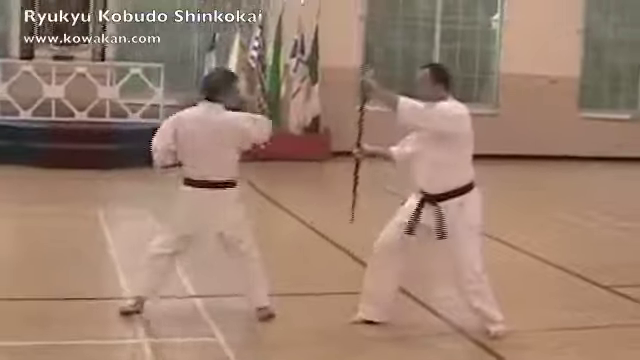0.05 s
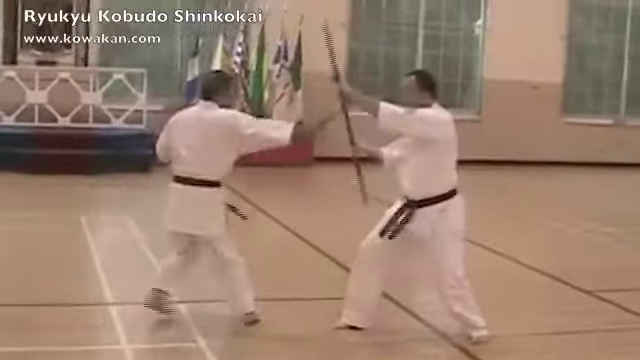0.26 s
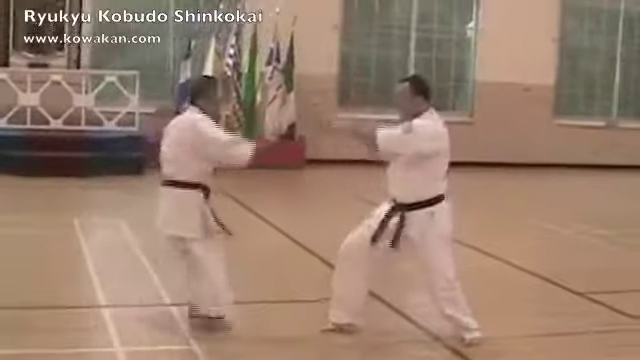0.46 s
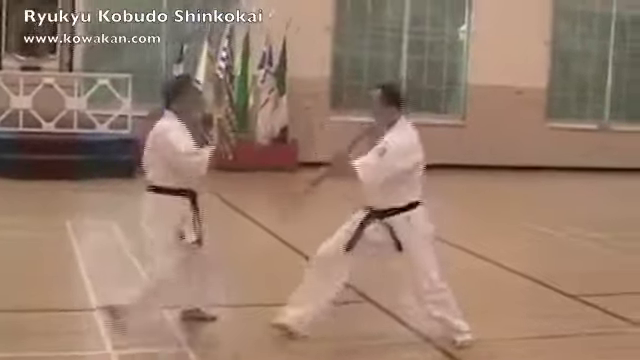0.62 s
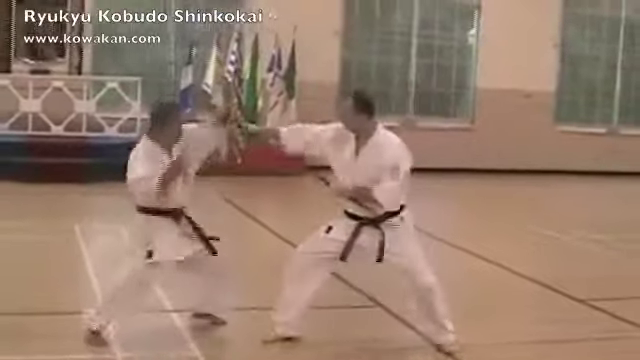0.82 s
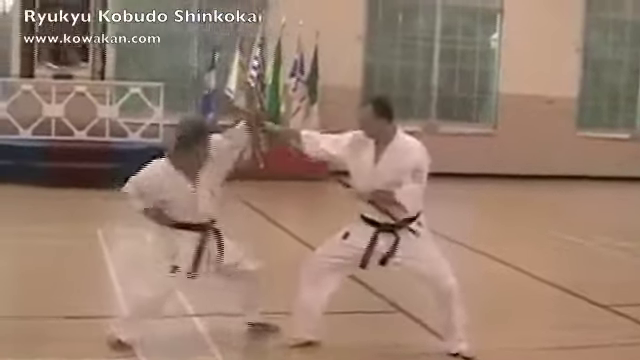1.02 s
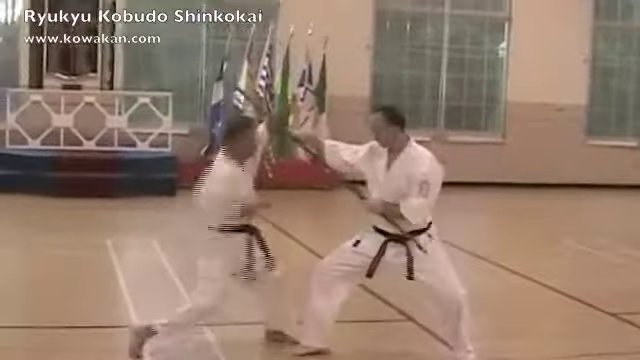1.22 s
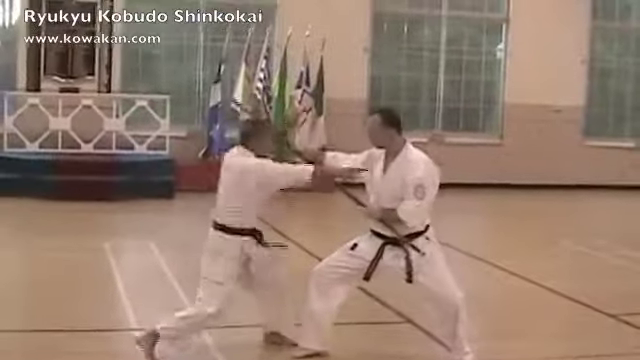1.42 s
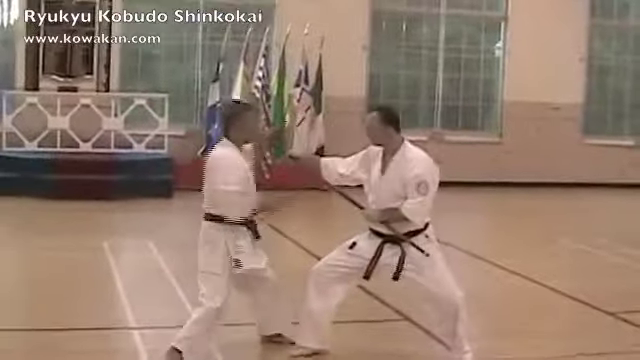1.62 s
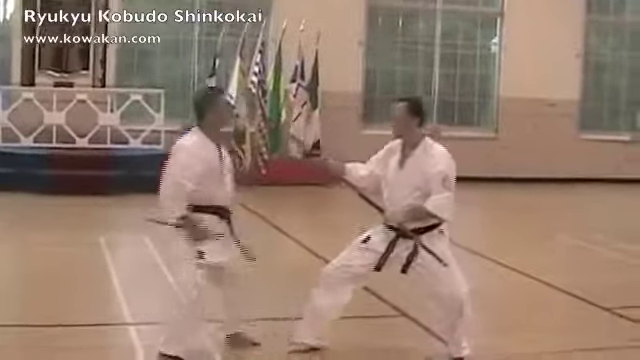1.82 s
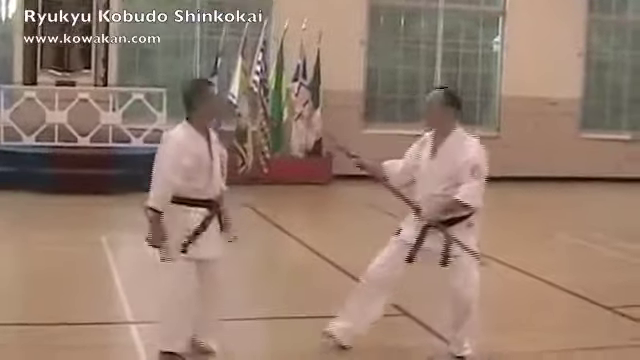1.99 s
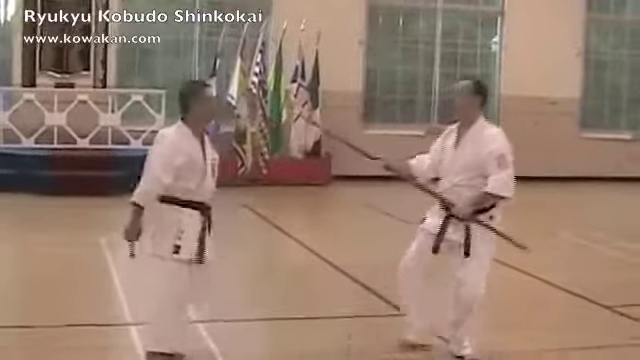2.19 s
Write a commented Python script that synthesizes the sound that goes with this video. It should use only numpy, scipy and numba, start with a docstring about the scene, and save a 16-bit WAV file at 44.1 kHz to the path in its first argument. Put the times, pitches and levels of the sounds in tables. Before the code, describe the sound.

A wooden staff cracks twice against a steel weapon, echoing through a large gymnasium.

```python
"""Staff against sai in an empty gymnasium

A wooden staff cracks twice on a steel sai while an earlier blow still dies away in the large hall.
Each crack overloads the camera microphone, whose limiter ducks and recovers, holding the hall's
long ring level before it fades. The ventilation hums, bare feet thud and slide on the wooden
floor, and cotton uniforms swish."""
import sys
import numpy as np
from scipy import signal
from scipy.fft import rfft, irfft, next_fast_len
from scipy.io import wavfile
from scipy.ndimage import uniform_filter1d
from numba import njit

SR = 44100
rng = np.random.default_rng(int(sys.argv[2]) if len(sys.argv) > 2 else 0)


def transcribe(signal):
    """Save signal, clipped to [-1, 1], as a 16-bit WAV file at the path in sys.argv[1]."""
    frames = np.atleast_2d(signal).T
    limited = np.clip(frames, -1, 1)
    pcm = np.round(limited * 32767).astype(np.int16)
    wavfile.write(sys.argv[1], SR, pcm)


N = 103635


def amp(db):
    return 10 ** (np.asarray(db) / 20)


def unit_rms(x):
    return x / np.sqrt(np.mean(x ** 2) + 1e-20)


def bump(x, centre, width):
    return np.exp(-((x - centre) / width) ** 2 / 2)


def curve_at(points, hz):
    point_hz, values = np.transpose(points)
    return np.interp(np.log(hz + 1), np.log(point_hz + 1), values)


def add(mix, start_s, sound):
    """Mixes in a sound that may have begun before time zero."""
    at = round(start_s * SR)
    sound = sound[:, max(-at, 0):]
    part = mix[:, max(at, 0):][:, :sound.shape[1]]
    part += sound[:, :part.shape[1]]


# Stereo width at the microphone. Each row: frequency in Hz, side minus mid in dB.
STEREO_WIDTH = [(50, -11), (140, -21), (300, -15.5), (700, -9), (2000, -8), (6000, -8), (14000, 7.5)]

def spread(pair):
    """Turns two unrelated signals into left and right, nearly mono in the bass."""
    mid, side = pair
    size = next_fast_len(len(mid))
    width = amp(curve_at(STEREO_WIDTH, np.fft.rfftfreq(size, 1 / SR)))
    side = irfft(rfft(side, size) * width, size)[:len(mid)]
    return np.array([mid + side, mid - side])


def noise(spectrum):
    """Stereo noise of a given colour, at unit level."""
    size = next_fast_len(N)
    white = rfft(rng.standard_normal((2, size)))
    colour = amp(curve_at(spectrum, np.fft.rfftfreq(size, 1 / SR)))
    return unit_rms(spread(irfft(white * colour, size)[:, :N]))


# The broad crack of wood on steel. Each row: frequency in Hz, relative level in dB.
CRACK_SPECTRUM = [(50, -29), (170, -25.5), (350, -17), (560, -20), (950, -13), (1400, -16.5), (2200, -9.5),
                  (2900, -17), (3900, -19), (4900, -22), (7500, -33.5), (11500, -40), (16000, -26)]
# The crack's beam. Each row: frequency in Hz, gain toward the microphone over the hall in dB.
CRACK_BEAM = [(100, -8), (500, 2.5), (900, 10.5), (1300, 12), (2000, 7.5), (3400, -0.5), (4400, 10),
              (7000, 2), (14000, -3)]
# Staff and sai ringing together. Each row: frequency in Hz, time to fall 60 dB in seconds,
# then relative level in dB for contact points 0, 1 and 2.
WEAPON_MODES = [(560, 0.027, -26, -15, -27), (815, 0.017, -38, -9, -4), (1091, 0.021, -8, -6.5, -8),
                (1250, 0.035, 0.5, -31, 3.5), (1578, 0.012, -9, -7, -0.5), (1688, 0.026, 5.5, -7.5, -20),
                (1839, 0.012, 1.5, -3.5, -15), (1994.5, 0.049, 1, -3.5, -19), (2160, 0.042, -6, -23, -10),
                (2290, 0.043, -23, -6.5, -12), (2510, 0.055, 0, -9.5, -2), (2572, 0.016, -8, -4, -11),
                (2750, 0.006, -9.5, -10, -9.5), (2930, 0.038, -7.5, -24, -6), (3130, 0.016, -5.5, -33, -13),
                (3425, 0.015, -14, -8, -43), (3747, 0.012, -11, -15, -28), (3980, 0.019, -10, -31, -17),
                (4370, 0.022, -11.5, -13.5, -38), (4550, 0.03, -13, -14, -10)]

def clack(point, crack_db, direct=False, bite_db=0, size=16384):
    """One blow: a sharp crack and the short modes that this contact point excites."""
    hz = np.fft.rfftfreq(size, 1 / SR)
    beam_db = direct * curve_at(CRACK_BEAM, hz)
    power = amp(curve_at(CRACK_SPECTRUM, hz) + crack_db + beam_db) ** 2
    for mode_hz, t60, *levels_db in WEAPON_MODES:
        half_width_hz = np.log(1000) / (2 * np.pi * t60)
        power += amp(levels_db[point]) ** 2 / (1 + ((hz - mode_hz) / half_width_hz) ** 2) ** 1.9
    power *= amp(bite_db * bump(hz, centre=3450, width=400)) ** 2  # the steel's bright bite
    log_gain = np.log(np.r_[power, power[-2:0:-1]]) / 2
    minimum_phase = np.exp(np.conj(signal.hilbert(log_gain)))  # packs the energy into the onset
    return np.fft.ifft(minimum_phase).real[:size // 2]


def near_paths(rattle_s, decay_s=.0022, size=1500):
    """The first contact, a brief rattle, and a quick scatter off the floor and the fighters."""
    t = np.arange(size) / SR
    mid, side = rng.standard_normal((2, size)) * np.exp(-np.maximum(t - rattle_s, 0) / decay_s)
    scatter = (mid + amp(-16) * np.array([side, -side])) / np.linalg.norm(mid)
    contact = t == 0
    return contact + amp(3) * scatter


# The empty gymnasium's ring. Each row: frequency in Hz, time to fall 60 dB in seconds.
HALL_DECAY = [(100, 4.3), (400, 2.07), (1000, 2.695), (2000, 2.48), (3500, 2.374), (5500, 1.545),
              (9000, 0.92), (15000, 0.88)]
# Echo clusters off distant walls. Each row: delay in seconds, rise above the tail in dB.
WALL_ECHOES = [(0.043, 0), (0.085, -2), (.122, -1.5), (.221, 4), (.301, 3.5)]

def hall(first_wall_s=0.038, build_s=0.0036, top_hz=12200, size=160000):
    """A quiet gap, then dense echoes from the walls, some in clusters; the treble dies first."""
    t = np.arange(size) / SR
    lumps_db = unit_rms(uniform_filter1d(rng.standard_normal(size), size=90))
    clusters_db = sum(db * bump(t, delay, width=.0025) for delay, db in WALL_ECHOES)
    echoes = rng.standard_normal((2, size)) * amp(lumps_db + clusters_db)
    hz, age, bands = signal.stft(unit_rms(echoes), SR, nperseg=256)
    bands = bands / (1 + (hz[:, None] / top_hz) ** 40)
    decay = np.exp(-np.log(1000) * age / curve_at(HALL_DECAY, hz)[:, None])
    tail = signal.istft(bands * decay, SR, nperseg=256)[1][:, :size]
    build = 1 - np.exp(-np.maximum(t - first_wall_s, 0) / build_s)
    tail *= np.maximum(build, amp(-11.5))
    return spread(tail / np.linalg.norm(tail[0]))


# Blows out on the floor. Each row: start in seconds, relative level in dB, trims in dB for the
# direct sound, the crack and the steel's bite, rattle in seconds, contact point on the staff (0-2).
BLOWS = [(-1.05, -10, 0, -0.5, 0, .004, 2), (0.2398, -4.5, 3.5, -1, 2, 0.0092, 0),
         (0.8319, -6, 3, -2, 10, 0.0037, 1)]

def staff_on_sai(direct_gain_db=41, hall_gain_db=50.5):
    """Each blow reaches the microphone directly and then by way of the walls."""
    out = np.zeros((2, N))
    for start, db, direct_db, crack_db, bite_db, rattle_s, point in BLOWS:
        beamed = clack(point, crack_db, direct=True, bite_db=bite_db)
        direct = signal.fftconvolve(near_paths(rattle_s), beamed[None], axes=1)
        ring = signal.fftconvolve(hall(), clack(point, crack_db)[None], axes=1)
        add(out, start, amp(db + direct_gain_db + direct_db) * direct)
        add(out, start, amp(db + hall_gain_db) * ring)
    return out


# Room tone from the vents. Each row: frequency in Hz, relative level in dB.
AIR_SPECTRUM = [(20, -9), (60, -6), (130, -4), (230, -2), (420, -8.5), (620, -32.5), (1000, -11),
                (3000, -26), (6000, -35), (13800, -46.5), (15000, -68)]

def ventilation(hum_hz=119.5):
    """Steady air noise and a wavering hum in the background."""
    t = np.arange(N) / SR
    rates_hz = rng.uniform(-11.5, 11, size=20)
    waver = unit_rms(sum(np.cos(2 * np.pi * (hz * t + rng.random())) for hz in rates_hz))
    hum = (1 + .35 * waver) * np.sin(2 * np.pi * hum_hz * t)
    return amp(-40) * noise(AIR_SPECTRUM) + amp(-45.5) * unit_rms(hum)


# Bare feet on the boards. Each row: start in seconds, thud in dB, slap in dB, decay in seconds.
FOOTFALLS = [(0.0, -33, -51, 0.16), (.15, -44.5, -47, 0.095), (0.646, -29, -36.5, 0.034),
             (0.714, -18, -29, 0.021), (0.789, -25.5, -39.5, 0.07), (.91, -28, -22, 0.032),
             (1.051, -37.5, -45, 0.098), (1.377, -27, -27.5, 0.036), (1.415, -63, -32, 0.12),
             (2.18, -48, -52, 0.044), (2.246, -44, -48, 0.06)]
# The tone of heel and of sole. Each row: frequency in Hz, relative level in dB.
THUD_SPECTRUM = [(20, 8), (60, -1.5), (130, 12), (220, 13), (330, -13), (700, -88), (3000, -57),
                 (16000, -80)]
SLAP_SPECTRUM = [(30, -6), (120, -2.5), (220, -2), (380, 6), (600, 1.5), (1200, -26.5), (4000, -41.5),
                 (16000, -75)]

def feet(rise_s=0.0063):
    """Heels thud on the sprung floor and soles slap; the hall returns the slaps."""
    t = np.arange(N) / SR
    thuds, slaps = np.zeros((2, N))
    for start, thud_db, slap_db, decay_s in FOOTFALLS:
        age = np.maximum(t - start, 0)
        envelope = np.minimum(age / rise_s, 1) * np.exp(-age / decay_s)
        thuds += amp(thud_db) * envelope
        slaps += amp(slap_db) * envelope
    soles = slaps * noise(SLAP_SPECTRUM)
    echo = signal.fftconvolve(hall(), soles[:1], axes=1)[:, :N]
    return thuds * noise(THUD_SPECTRUM) + soles + amp(-5.5) * echo


# The fighters' movements, heard dry. Each row: centre in seconds, half length in seconds, level in dB.
RUBS = [(0.783, 0.096, -52), (1.389, 0.0043, -44), (1.418, 0.097, -55.5), (1.562, 0.033, -53),
        (1.877, 0.12, -52.5), (2.076, 0.045, -52)]
# The hiss of rubbing. Each row: frequency in Hz, relative level in dB.
RUB_SPECTRUM = [(200, -18), (2000, 10), (5000, 11), (7500, -3), (11000, 4.5), (13800, -16.5), (15000, -29)]

def swishes():
    """Cotton sleeves and sliding soles rub in soft swells of hiss."""
    t = np.arange(N) / SR
    swells = sum(amp(db) * bump(t, centre, half_length) for centre, half_length, db in RUBS)
    return swells * noise(RUB_SPECTRUM)


def scene():
    """The gymnasium as heard from the camera's position."""
    return staff_on_sai() + feet() + swishes() + ventilation()


@njit
def limiter(over_db, attack_s, recover_db_per_s):
    """Gain reduction in dB: it chases every excess and lets go at a steady pace."""
    reduction_db, held = np.zeros(len(over_db)), 0.
    for i in range(len(over_db)):
        rise = max(over_db[i] - held, 0.) / (attack_s * SR)
        held = max(held + rise - recover_db_per_s / SR, 0.)
        reduction_db[i] = held
    return reduction_db


def record(dry):
    """The camera microphone: its limiter is too slow for the cracks, which clip; the top is cut."""
    threshold_db, knee, top_hz = -6, 12, 16150
    over_db = 20 * np.log10(abs(dry).max(0) + 1e-9) - threshold_db
    ducked = dry / amp(limiter(over_db, attack_s=.003, recover_db_per_s=33))
    clipped = ducked / (1 + abs(ducked) ** knee) ** (1 / knee)
    lowpass = signal.firwin(255, top_hz, window=("kaiser", 9), fs=SR)
    return signal.oaconvolve(clipped, lowpass[None], "same")


dry = scene()
out = record(dry)
transcribe(out)
```